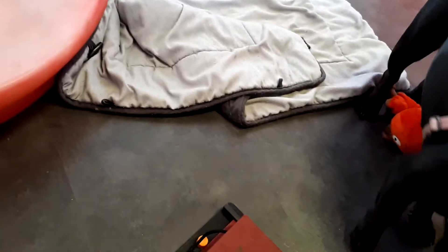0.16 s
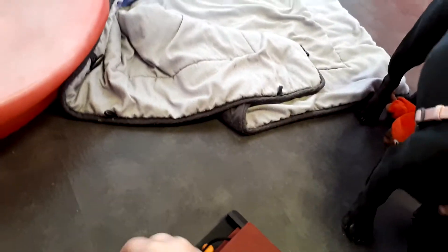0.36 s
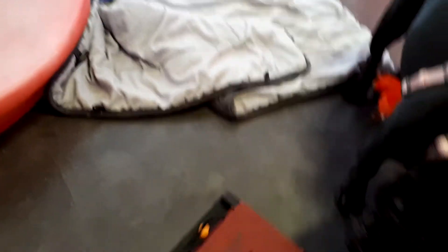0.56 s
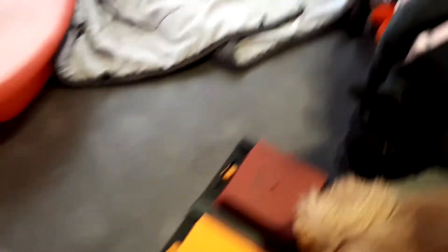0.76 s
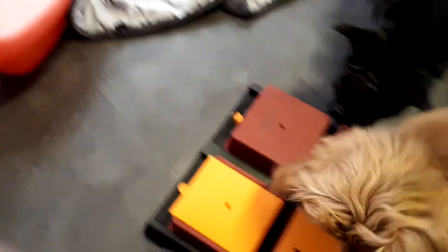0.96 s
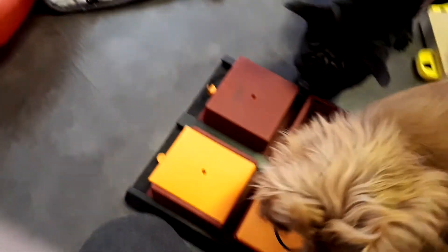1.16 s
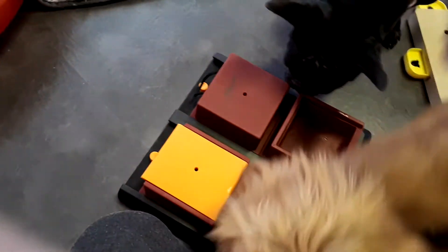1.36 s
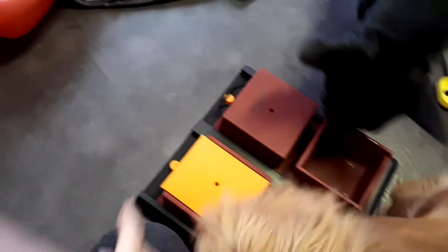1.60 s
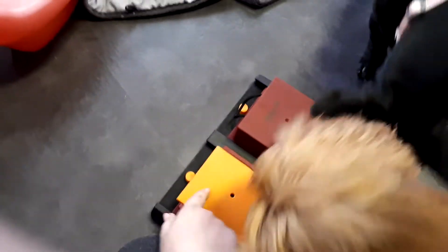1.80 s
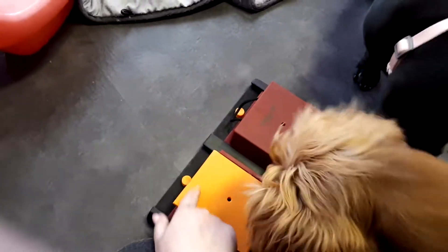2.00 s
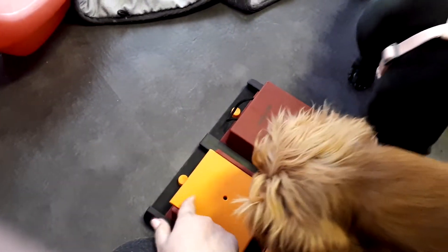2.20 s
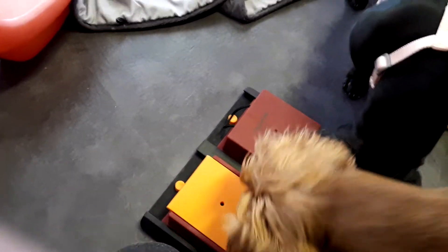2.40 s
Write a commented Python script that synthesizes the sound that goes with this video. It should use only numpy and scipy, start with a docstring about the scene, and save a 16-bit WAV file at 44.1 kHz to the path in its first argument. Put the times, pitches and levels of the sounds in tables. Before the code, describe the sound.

Plastic puzzle lids knock and clatter in two short clusters as dogs nose them indoors.

```python
"""Dogs at a plastic treat puzzle

Dogs nose at a puzzle on a living-room floor, close by. A lid knocks and bounces, another slaps open and skids;
later a catch snaps, pegs rattle and trays knock on the board. Blows sum decaying modes and a noise crack.
Slides are drifting friction hiss, paws are slow-rising low modes with a scuff, and the board thud is a sagging sine.
Noise tails form the brief room sound; a steady coloured noise is the air."""
import sys
import numpy as np
from scipy import signal
from scipy.fft import rfft, irfft, next_fast_len
from scipy.io import wavfile
from scipy.ndimage import uniform_filter1d

SR = 44100
rng = np.random.default_rng(int(sys.argv[2]) if len(sys.argv) > 2 else 0)


def inscribe(sig):
    """Save sig as 16-bit PCM at rate SR to the path in sys.argv[1].

    A 1-D sig is mono; a 2-D sig holds one channel per row.
    Samples are clipped to [-1, 1] before scaling.
    """
    pcm = np.round(np.clip(np.atleast_2d(sig).T, -1, 1) * 32767)
    wavfile.write(sys.argv[1], SR, pcm.astype(np.int16))


N = 108045

LEFT_LAG_S = 0.00016  # right-mic lag of lid and box, which lie further left


def puzzle():
    """All struck plastic parts; board and trays share one room response."""
    return lid() + box() + in_room(board() + trays(), early_db=-7, tail_db=-15) + thud() + catch() + pegs()


# lid modes [f/Hz, level/dB, t60/s]
LID_MODES = [(425, -11, 0.036), (533, -9.5, 0.03), (1085, -16, 0.032), (1440, -10.5, 0.024),
             (1590, -13, 0.022), (2223, -18, .026), (2410, -17, .022), (4120, -27, 0.018)]
# lid contact noise [f/Hz, density/dB]
LID_CRACK = [(100, -32), (800, -10), (1500, 0), (2700, -3), (3400, -14), (7500, -23), (10000, -38),
             (16000, -46)]
# lid knock and bounces [t/s, ring level/dB, crack level/dB]
LID_KNOCKS = [(.2062, -1, -14), (.2083, -13, -13), (.2235, -13, -25), (.232, -15, -32), (.2465, -24, -29),
              (.2605, -10, -25), (.287, -18, -32), (.303, -25, -35), (.3385, -23, -44), (.360, -22.5, -41),
              (.379, -22, -40)]


def lid():
    """Short-lived lid modes; lighter bounces are duller and stray in pitch."""
    ring, contact = blows(LID_KNOCKS, LID_MODES, LID_CRACK, crack_t60=0.026, rise_s=0.0002,
                          low_hz=300, stray=0.07, dull=0.2)
    return in_room(ring + contact, early_db=-13, tail_db=-16, lag_s=LEFT_LAG_S)


# box modes [f/Hz, level/dB, t60/s]
BOX_MODES = [(375, -11.5, 0.096), (440, -11, 0.05), (689, -19, 0.048), (828, -18.5, 0.053),
             (1074, -20, 0.053), (1391, -20.5, 0.056), (1866, -21, 0.066), (4104, -12, 0.06),
             (4320, -18, 0.05)]
# box contact noise [f/Hz, density/dB]
BOX_CRACK = [(40, -20), (270, -13), (700, 3), (3000, -5), (4500, -3.5), (7800, -3.5), (9500, -13),
             (16000, -15.5)]
# box slaps [t/s, ring level/dB, crack level/dB]
BOX_SLAPS = [(.4435, -20, -52.5), (.4478, 0, -10), (.4635, -7, -25)]


def box():
    """Box modes plus a crack; the ring excites the room less than the crack."""
    ring, contact = blows(BOX_SLAPS, BOX_MODES, BOX_CRACK, crack_t60=0.03, rise_s=0.0003, low_hz=59.8)
    return (in_room(ring, early_db=-16, tail_db=-18, lag_s=LEFT_LAG_S)
            + in_room(contact, early_db=-12, tail_db=-10, lag_s=LEFT_LAG_S))


# board modes [f/Hz, level/dB, t60/s]
BOARD_MODES = [(417, -11, 0.025), (496, -13, 0.031), (846, -27.5, 0.05), (1098, -30.5, 0.046),
               (1680, -23, 0.031), (2760, -34, 0.068)]
# contact noise of board and trays [f/Hz, density/dB]
KNOCK_CRACK = [(100, -2), (400, 9.5), (700, -1), (1800, -3), (3000, -10), (7500, -19), (16000, -47)]
# board thumps [t/s, ring level/dB, crack level/dB]
BOARD_THUMPS = [(1.8065, -9, -52), (1.8112, -10, -23), (1.8163, 0, -23)]


def board():
    """Board modes behind a softened contact."""
    return sum(blows(BOARD_THUMPS, BOARD_MODES, KNOCK_CRACK, crack_t60=0.062, rise_s=0.00076, low_hz=110))


# tray modes [f/Hz, level/dB, t60/s]
TRAY_MODES = [(110, -37, 0.16), (292, -33, 0.029), (420.4, -16, 0.041), (535, -24.5, 0.039),
              (1320, -41, 0.018)]
# tray knocks [t/s, ring level/dB, crack level/dB]
TRAY_KNOCKS = [(2.0305, -2, -22), (2.0382, -5, -30), (2.1605, -7, -29.5), (2.173, -8.5, -30.5),
               (2.249, -19, -50)]


def trays():
    """Tray modes; lighter knocks stray in pitch."""
    return sum(blows(TRAY_KNOCKS, TRAY_MODES, KNOCK_CRACK, crack_t60=0.036, rise_s=0.00066,
                     low_hz=80.4, stray=0.12))


THUD_S, THUD_DB, THUD_RISE_S, THUD_T60_S = 1.804, -9, 0.014, 0.085
THUD_START_HZ, THUD_SAG_HZ_PER_S = 222, 710


def thud():
    """The whole board is pushed against the floor: one low note that sags as it dies."""
    t, out = np.arange(SR // 5) / SR, np.zeros((2, N))
    turns = THUD_START_HZ * t - THUD_SAG_HZ_PER_S * t ** 2 / 2
    rise = np.minimum(t / THUD_RISE_S, 1) ** 2
    note = np.sin(2 * np.pi * turns) * rise * amp(THUD_DB - 60 * t / THUD_T60_S)
    add(out, THUD_S, note[None])
    return out


# catch modes [f/Hz, level/dB, t60/s]
CATCH_MODES = [(525, -36, 0.058), (1790, -33.5, 0.046), (3680, -29.5, 0.038), (4060, -25.5, 0.042)]
# catch contact noise [f/Hz, density/dB]
CATCH_CRACK = [(100, -19), (1000, -8), (2000, 5.5), (5500, -3), (8000, -1.5), (12500, -2.5), (16000, -25)]
# catch snaps [t/s, ring level/dB, crack level/dB]
CATCH_SNAPS = [(1.7765, -0.5, -36), (1.782, -31, -35.5)]


def catch():
    """Fast-rising catch modes with a longer crack."""
    ring, contact = blows(CATCH_SNAPS, CATCH_MODES, CATCH_CRACK, crack_t60=0.12, rise_s=0.0001, low_hz=150)
    return in_room(ring + contact, early_db=1, tail_db=-12)


# peg modes [f/Hz, level/dB, t60/s]
PEG_MODES = [(487, -34.5, 0.041), (1073, -34, 0.028), (1488, -35, 0.055), (1860, -42, 0.05)]
# peg contact noise [f/Hz, density/dB]
PEG_CRACK = [(100, -24), (600, -10), (1400, 2), (2600, -3), (7000, -5), (10000, -15.5), (16000, -23)]
# peg rattles [t/s, ring level/dB, crack level/dB]
PEG_RATTLES = [(1.920, -1, -40), (1.9247, -8, -32), (1.931, -8, -34), (1.938, -4, -36), (1.9427, -0.5, -27),
               (2.218, -9, -40)]


def pegs():
    """Peg modes in quick succession; lighter touches stray in pitch."""
    ring, contact = blows(PEG_RATTLES, PEG_MODES, PEG_CRACK, crack_t60=0.03, rise_s=0.00015,
                          low_hz=200, stray=0.08)
    return in_room(ring + contact, early_db=-2, tail_db=-12)


# hard-edge contact noise [f/Hz, density/dB]
RIM_CRACK = [(100, -22), (600, -3), (4500, -1), (7300, 3), (16000, -22)]
# rim ticks, no ring [t/s, level/dB]
RIM_TICKS = [(0.3065, -37), (0.5136, -31), (1.8108, -19), (1.8145, -24), (1.9243, -31), (2.0267, -24.5),
             (2.1559, -28)]


def rims():
    """Hard edges touch with a dry, bright tick, often just ahead of a knock."""
    out = np.zeros((2, N))
    for s, db in RIM_TICKS:
        add(out, s, amp(db) * crack(RIM_CRACK, t60_s=0.022))
    return in_room(out, early_db=-1, tail_db=-16)


# skid level [t/s, level/dB]
SKID_LEVEL = [(0.463, -30.5), (0.528, -41), (0.655, -49.5), (.70, -88)]
# skid friction noise [f/Hz, density/dB]
SKID_SCRAPE = [(50, -12), (130, 2.5), (400, -5.5), (800, 2), (1800, -1), (3000, -9), (7500, -6),
               (9500, -15), (16000, -14.5)]


def skidding(rough_db=3, right_db=2):
    """After its slap the box skids a little way and stops: fading friction noise, louder on the right."""
    s, db = np.transpose(SKID_LEVEL)
    t = np.arange(N) / SR
    level = amp(np.interp(t, s, db)) * (t > s[0]) * (t < s[-1])
    return rubbing(SKID_SCRAPE, level, rough_db) * amp([[0], [right_db]])


# sliding parts [start t/s, end t/s, level/dB, low-mid peak/dB, whistle f/Hz]
SLIDES = [(-.02, 0.182, -43.5, 8, 9600), (.2, .41, -56, 0, 2300), (1.514, 1.77, -50.5, 1.5, 11700)]
# slide friction noise [f/Hz, density/dB]
SLIDE_HISS = [(200, -14), (720, -18), (4200, -8), (7500, -9.5), (8700, -14), (16000, -18)]
# resonances of every slide [f/Hz, half width/Hz, peak/dB]
SLIDE_MODES = [(1000, 110, 7), (5050, 170, 5)]
SLIDE_EDGE_S, SLIDE_ROUGH_DB = 0.027, 0.5
HUM_HZ, HUM_HALF_WIDTH_HZ = 430, 130
WHISTLE_HALF_WIDTH_HZ, WHISTLE_DB = 900, 7.5


def sliding():
    """Parts slide: friction hiss with fixed resonances and a whistle peak per slide; a low-mid band, strongest
    early on, lies under the hiss."""
    t, hz, out = np.arange(N) / SR, np.fft.rfftfreq(1024, 1 / SR), np.zeros((2, N))
    for start, end, db, hum_db, whistle_hz in SLIDES:
        hum = (HUM_HZ, HUM_HALF_WIDTH_HZ, hum_db)
        whistle = (whistle_hz, WHISTLE_HALF_WIDTH_HZ, WHISTLE_DB)
        colour = read(SLIDE_HISS, hz)
        for centre, half_width, peak_db in list(SLIDE_MODES) + [hum, whistle]:
            colour = colour + peak_db / (1 + ((hz - centre) / half_width) ** 2)
        level = amp(db) * np.clip(np.minimum(t - start, end - t) / SLIDE_EDGE_S, 0, 1)
        out += rubbing(np.column_stack([hz, colour]), level, SLIDE_ROUGH_DB)
    return out


# floor modes [f/Hz, level/dB, t60/s]
FLOOR_MODES = [(80.6, -54.5, 0.36), (121.2, -49, 0.3), (176, -46, 0.16), (271, -37.5, 0.04),
               (395, -40.5, 0.047)]
# paw contact noise [f/Hz, density/dB]
STEP_SCUFF = [(30, -48), (100, 7.5), (400, -3.5), (700, -15), (4000, -17), (16000, -34)]
# paw steps [t/s, level/dB]
STEPS = [(.855, -7), (1.225, -4), (1.255, 1), (1.389, -3), (1.484, -6.5), (2.074, -0.5), (2.122, -3.5),
         (2.272, 2.5), (2.406, -6), (2.424, 1)]


def paws(scuff_db=-47):
    """Soft pads excite low floor modes with a slow rise and a scuff."""
    rows = [(s, db, db + scuff_db) for s, db in STEPS]
    pads = sum(blows(rows, FLOOR_MODES, STEP_SCUFF, crack_t60=0.098, rise_s=0.0084, low_hz=60))
    return in_room(pads, early_db=-9, tail_db=-13)


# room air noise [f/Hz, density/dB]
AIR = [(25, -16), (92, 0), (300, -10.5), (650, -22), (1700, -22), (3200, -28), (7300, -25), (8700, -33),
       (16000, -38)]
AIR_RMS_DB = -61.5


def air():
    """Quiet room air: steady coloured noise."""
    return amp(AIR_RMS_DB) * noise(AIR, N)


def blows(rows, modes, contact, crack_t60, rise_s, low_hz, stray=0, dull=0):
    """Decaying modes and noise cracks as (ring, crack); little radiates below low_hz."""
    t, out = np.arange(SR // 5) / SR, np.zeros((2, 2, N))
    rise = 1 - np.exp(-t / rise_s)  # soft contacts rise slowly
    for s, ring_db, crack_db in rows:
        # light touches stray in pitch and are duller
        pitch = 1 + stray * max(1 - amp(ring_db), 0) * rng.uniform(-1, 1, len(modes))
        tilt_db_per_octave = dull * min(ring_db, 0)
        ring = np.zeros(len(t))
        for k, (hz, db, t60) in enumerate(modes):
            mode_db = db + tilt_db_per_octave * np.log2(hz / modes[0][0])
            decay = amp(mode_db - 60 * t / t60)
            ring += (-1) ** k * decay * np.sin(2 * np.pi * hz * pitch[k] * t)
        add(out[0], s, amp(ring_db) * ring[None] * rise)
        add(out[1], s, amp(crack_db) * crack(contact, crack_t60) * rise)
    return signal.sosfilt(signal.butter(2, low_hz, "highpass", fs=SR, output="sos"), out)


def crack(spectrum, t60_s):
    """Contact noise with exponential decay."""
    t = np.arange(SR // 5) / SR
    return amp(-60 * t / t60_s) * noise(spectrum, len(t))


RUB_DRIFT_DB = 2.5  # rms colour drift


def rubbing(spectrum, level, rough_db):
    """Friction noise whose grip varies from moment to moment and whose colour drifts in patches."""
    grip = amp(rough_db * unit(uniform_filter1d(rng.standard_normal(N), size=200)))
    z = signal.stft(noise(spectrum, N), nperseg=512)[2]
    drift = uniform_filter1d(rng.standard_normal(z.shape[1:]), size=7, axis=0)  # across frequency
    drift = unit(uniform_filter1d(drift, size=14, axis=1))  # across time
    rub = unit(signal.istft(z * amp(RUB_DRIFT_DB * drift), nperseg=512)[1][:, :N])
    return in_room(rub * level * grip, early_db=-3, tail_db=-11)


# room decay [f/Hz, t60/s]
ROOM_T60 = [(100, 0.24), (400, 0.37), (1200, 0.35), (4000, 0.5), (8000, 0.38), (16000, 0.09)]
# room colour [f/Hz, density/dB]
ROOM_TONE = [(100, -1.5), (350, 1.5), (700, 4), (4000, -5), (16000, -1)]
# right-mic direct response, shaded in the treble [f/Hz, level/dB]
SHADE = [(1500, 1), (2800, -1.5), (4100, -1), (7500, -6.5), (11000, -11.5), (16000, -8)]
LAG_S = 0.00005  # right-mic lag


def in_room(x, early_db, tail_db, lag_s=LAG_S, early_t60=0.2, gap_s=0.0065, build_s=0.012):
    """Direct sound at two mics, early scatter off floor and furniture, then the room's tail."""
    hz, t, z = signal.stft(noise(ROOM_TONE, SR), SR, nperseg=256)
    decay = amp(-60 * t / read(ROOM_T60, hz)[:, None])
    tail = signal.istft(z * decay, SR, nperseg=256)[1][:, :SR]
    t = np.arange(SR) / SR
    tail = unit(tail * np.clip((t - gap_s) / build_s, 0, 1))
    t = t[:SR // 10]
    early = unit(noise(ROOM_TONE, SR // 10) * amp(-60 * t / early_t60) * np.minimum(t / gap_s, 1))
    echo = amp(tail_db) * tail
    add(echo, 0, amp(early_db) * early)
    wet = signal.fftconvolve(x[:1], echo / np.sqrt(SR), axes=1)[:, :N]
    size = next_fast_len(N + SR // 10)
    hz = np.fft.rfftfreq(size, 1 / SR)
    lag = np.exp(-2j * np.pi * hz * lag_s)
    right = irfft(rfft(x[1], size) * amp(read(SHADE, hz)) * lag, size)[:N]
    return np.array([x[0], right]) + wet


# left-right likeness [f/Hz, coherence 0-1]
ALIKE = [(50, 0.65), (300, 0.93), (700, 0.55), (1400, 0.31), (16000, 0.037)]


def noise(spectrum, size):
    """Coloured stereo noise at rms 1, alike in the bass and nearly unrelated in the treble."""
    hz = np.fft.rfftfreq(size, 1 / SR)
    a, b = np.exp(2j * np.pi * rng.random((2, len(hz))))
    same = np.clip(read(ALIKE, hz), 0, 1)
    pair = np.array([a, same * a + np.sqrt(1 - same ** 2) * b])
    return unit(irfft(pair * amp(read(spectrum, hz)), size))


def amp(db):
    """Decibels to gain."""
    return 10 ** (np.asarray(db) / 20)


def unit(x):
    """Scales to rms 1."""
    return x / np.sqrt(np.mean(x ** 2) + 1e-20)


def read(points, hz):
    """Reads a table on a log-frequency axis."""
    f, value = np.transpose(points)
    return np.interp(np.log(hz + 1), np.log(f + 1), value)


def add(mix, s, sound):
    """Mixes a sound in at time s."""
    part = mix[:, max(round(s * SR), 0):][:, :sound.shape[1]]
    part += sound[:, :part.shape[1]]


def scene():
    """Puzzle, friction and paws over the quiet air of the room."""
    return puzzle() + rims() + skidding() + sliding() + paws() + air()


def record(dry):
    """The recorder's band limit: a 16.2 kHz low-pass."""
    lowpass = signal.firwin(255, 16200, window=("kaiser", 9), fs=SR)
    return signal.oaconvolve(dry, lowpass[None], "same")


dry = scene()
out = record(dry)
inscribe(out)
```